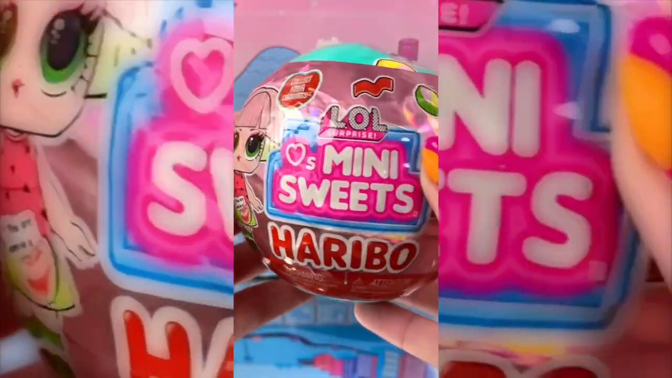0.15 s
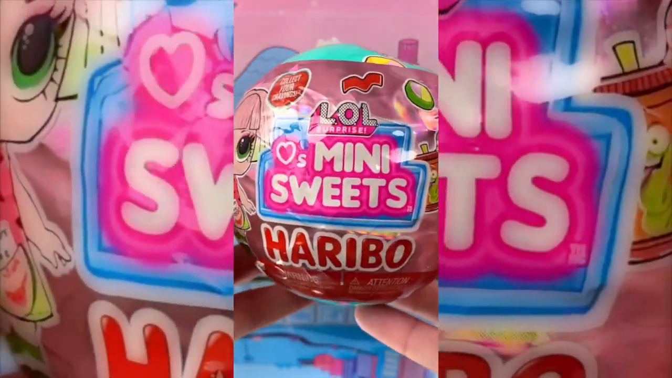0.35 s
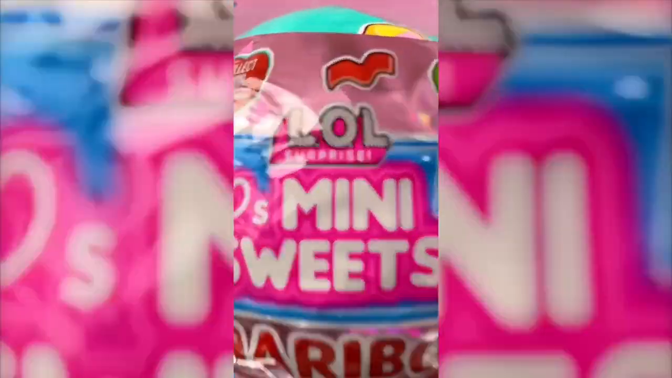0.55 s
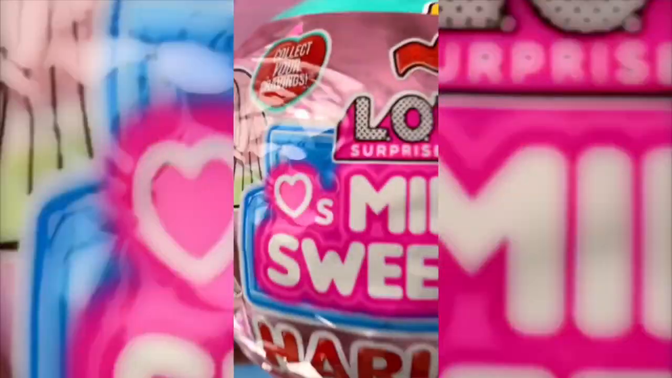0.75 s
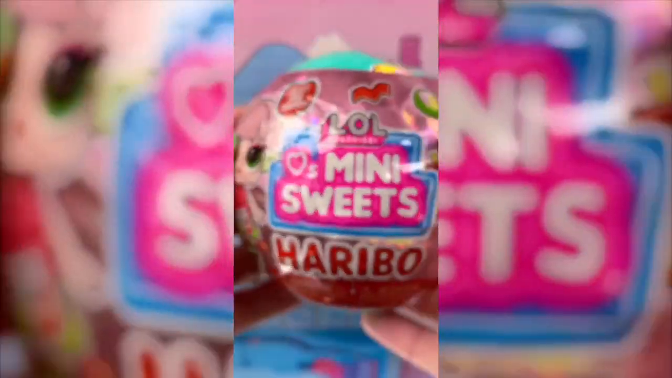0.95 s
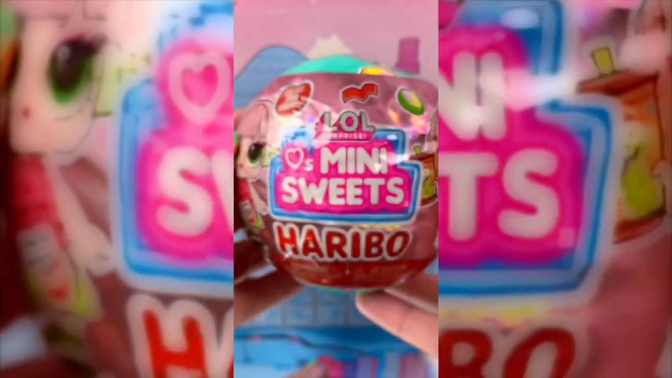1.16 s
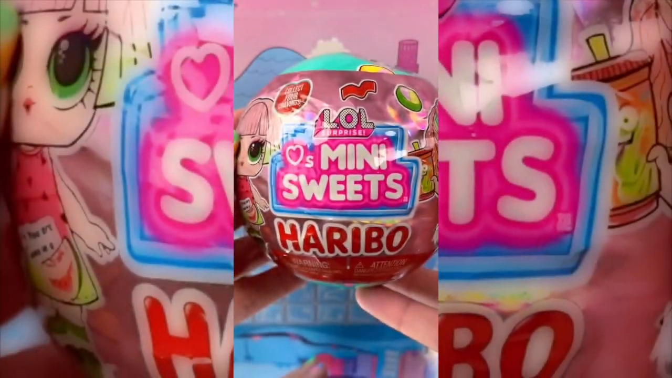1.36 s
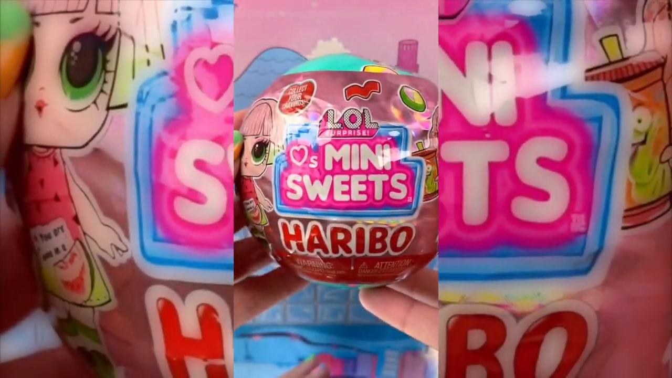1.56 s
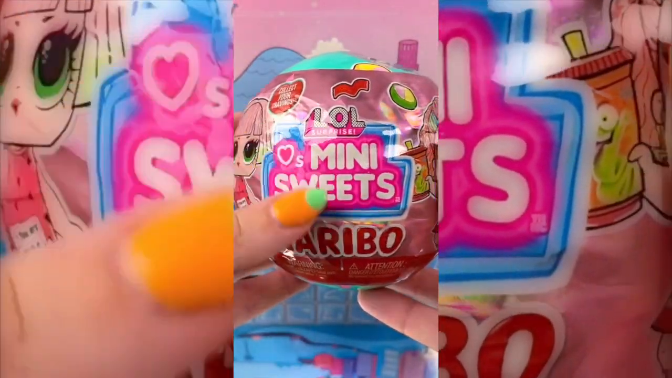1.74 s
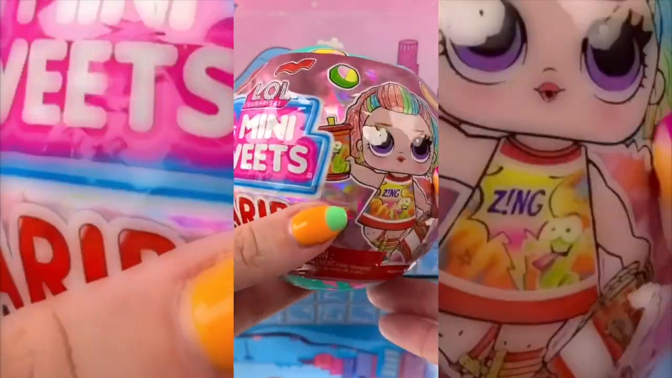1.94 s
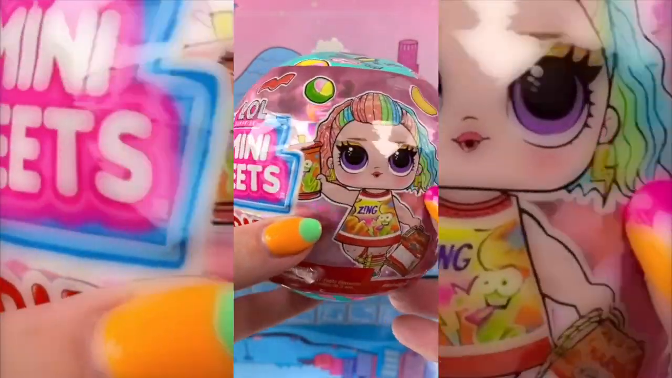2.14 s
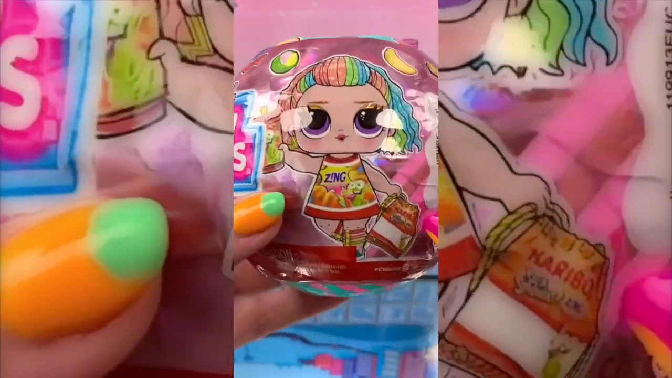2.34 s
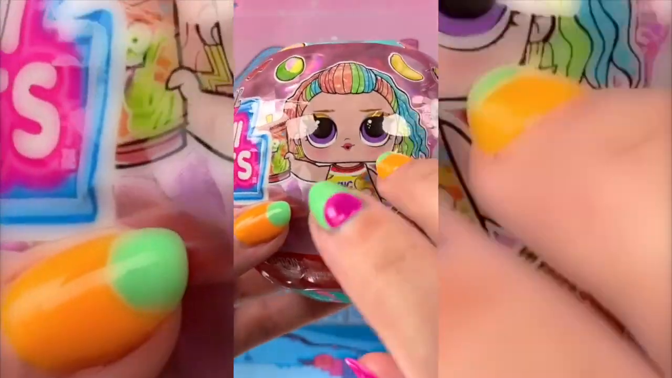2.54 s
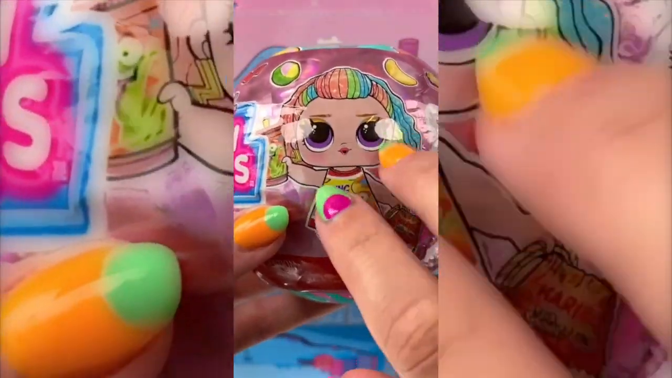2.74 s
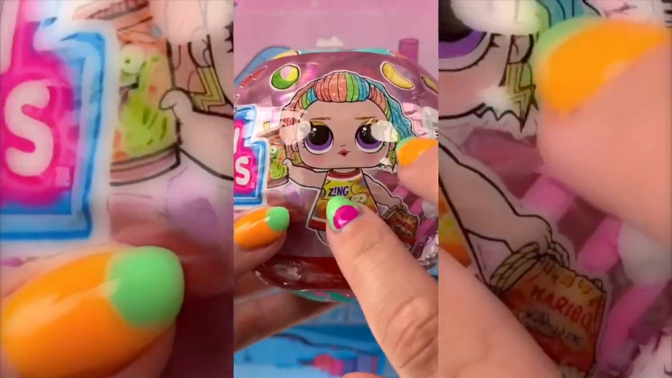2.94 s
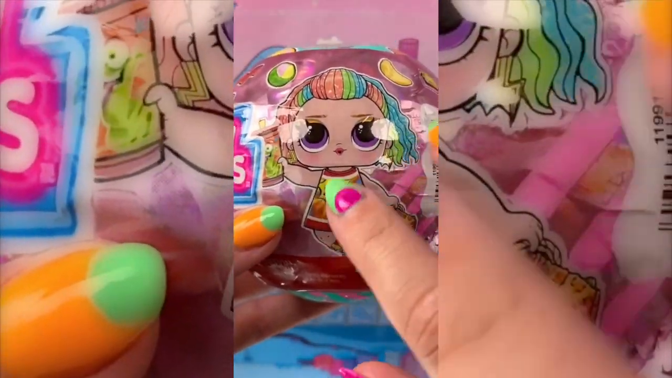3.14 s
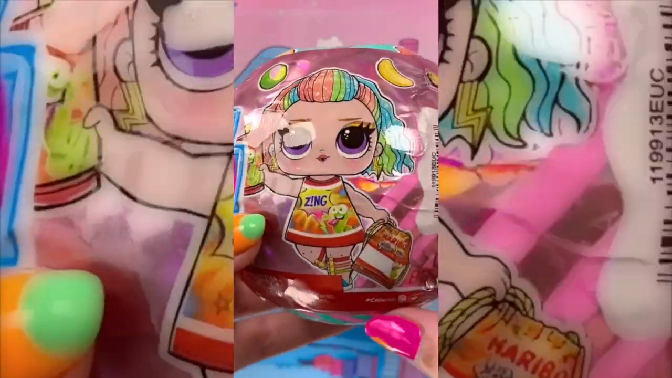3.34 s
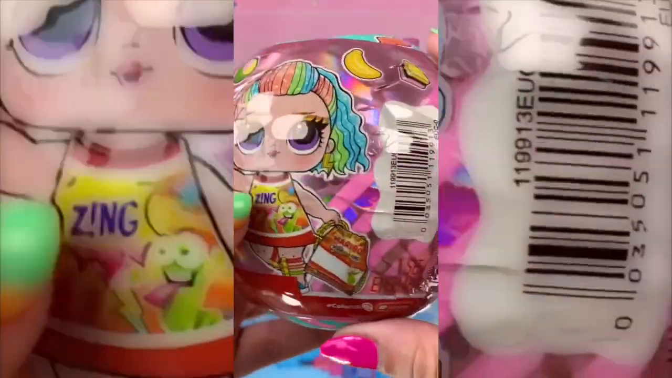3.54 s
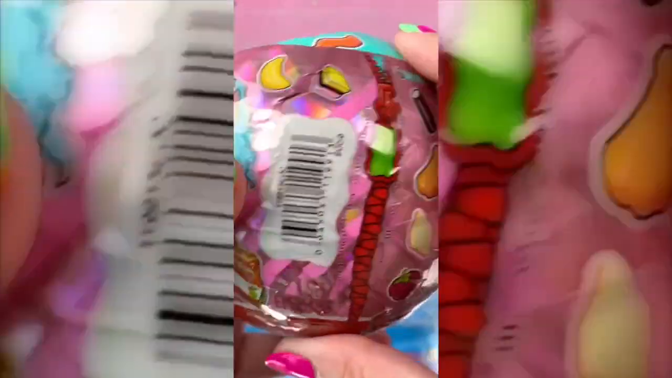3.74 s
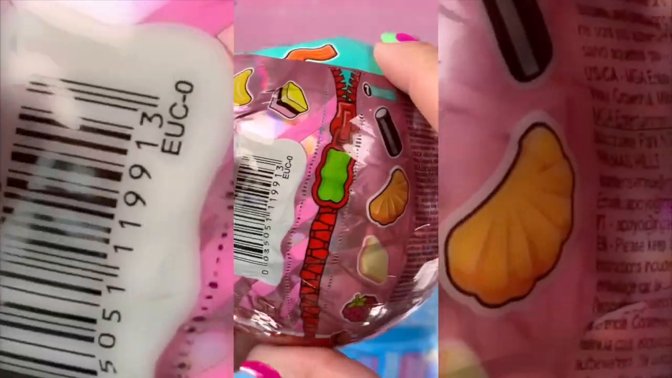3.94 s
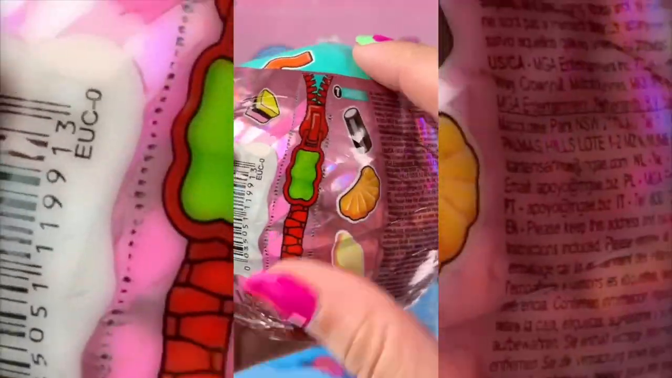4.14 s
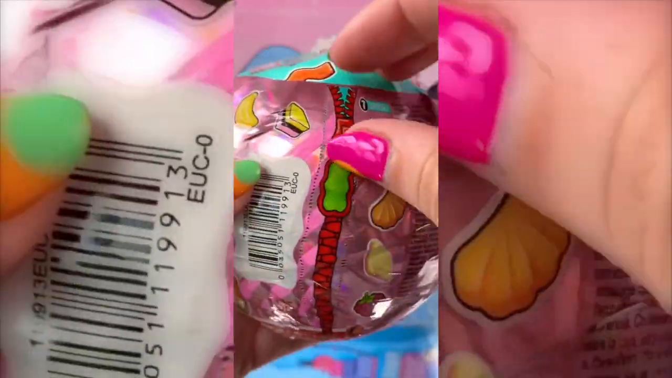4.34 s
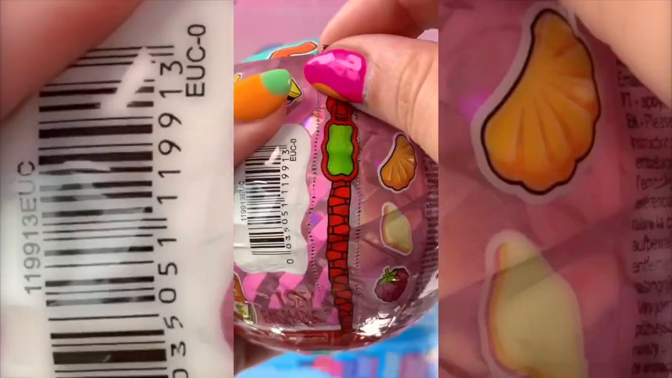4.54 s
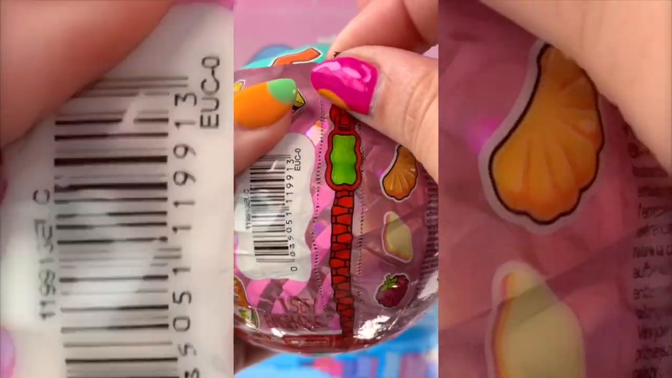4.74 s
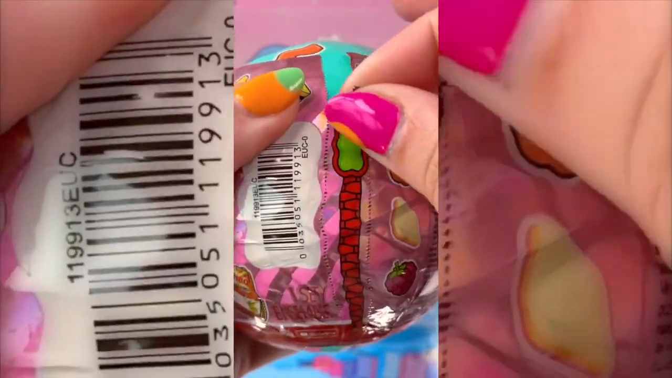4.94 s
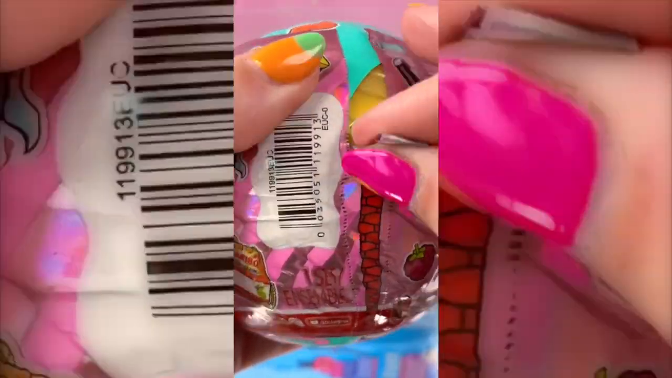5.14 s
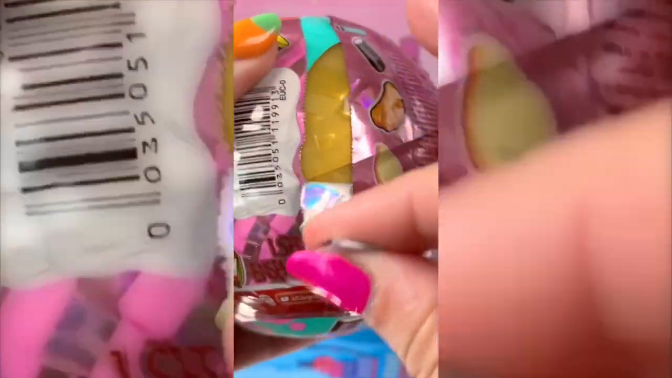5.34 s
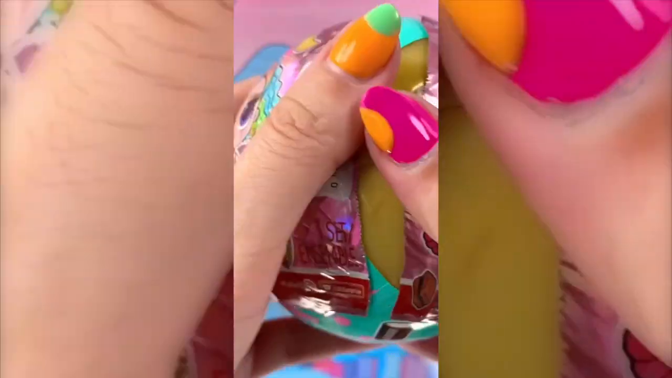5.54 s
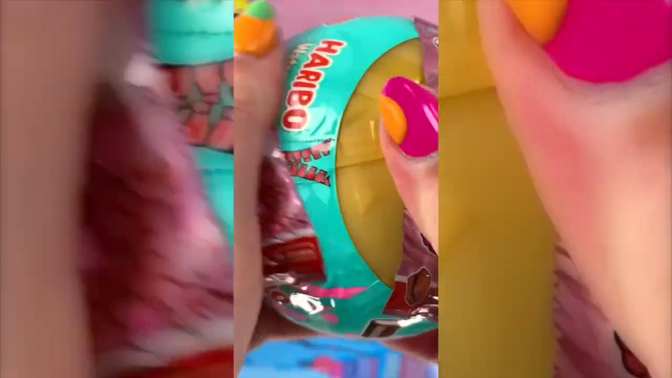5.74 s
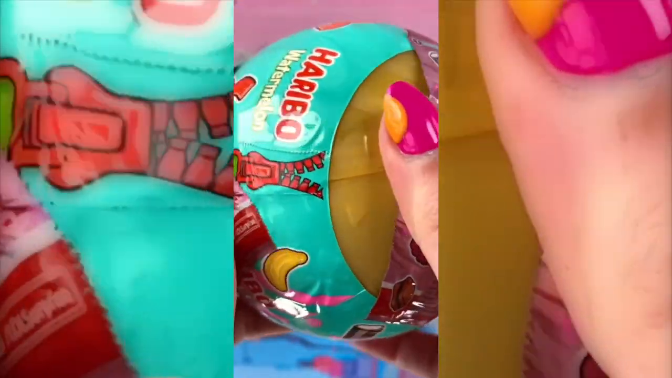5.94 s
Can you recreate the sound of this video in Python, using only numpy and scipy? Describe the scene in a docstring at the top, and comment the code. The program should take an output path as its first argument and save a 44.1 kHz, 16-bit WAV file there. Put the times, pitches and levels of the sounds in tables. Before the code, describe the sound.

Firm fingernail taps on a film-wrapped hollow plastic ball, then a perforated strip zips open in bursts and the film crackles.

```python
"""Film-wrapped toy ball unwrapped

A plastic ball in shrink film, close to two microphone ports in a small room with rumble, hum and a far thump.
Fingers brush the film (filtered grains); nails tap film and shell (noise cracks plus modes), four taps firmly.
A perforated strip tears bridge by bridge: cracks and plucked rings, mostly lower as its loose end grows.
The opened film is peeled: folds crack and ring their panels, and sliding film crackles."""
import sys
import numpy as np
from scipy import signal
from scipy.fft import rfft, irfft, next_fast_len
from scipy.io import wavfile
from scipy.ndimage import uniform_filter1d, map_coordinates

SR = 44100
rng = np.random.default_rng(int(sys.argv[2]) if len(sys.argv) > 2 else 0)


def bounce(signal):
    """Save signal as a 16-bit WAV file at the path given by the first command-line argument."""
    frames = np.transpose(np.atleast_2d(signal))
    limited = np.clip(frames, -1, 1)
    pcm = np.round(limited * 32767).astype(np.int16)
    wavfile.write(sys.argv[1], SR, pcm)


N = 264159
TIME = np.arange(N) / SR


def from_db(db):
    """Amplitude ratio of a level in dB."""
    return 10 ** (np.asarray(db) / 20)


def at_hz(points, hz):
    """Read a table on a log-frequency axis."""
    table_hz, values = np.array(points)[:, 0], np.array(points)[:, 1]
    return np.interp(np.log(np.maximum(hz, 1)), np.log(table_hz), values)


def add(track, s, sound):
    """Mix a short sound in at a time in seconds."""
    start = min(max(round(s * SR), 0), N)
    track[start:start + len(sound)] += sound[:N - start]


def split_bands(x, order, split_hz):
    """Low and high part of a sound, by Butterworth filters."""
    return [signal.sosfilt(signal.butter(order, split_hz, kind, fs=SR, output="sos"), x)
            for kind in ("low", "high")]


def coloured(x, points, size=8192):
    """Causal minimum-phase filter with the given gains, built by folding the cepstrum."""
    gains = from_db(at_hz(points, np.fft.rfftfreq(size, 1 / SR)))
    cepstrum = irfft(np.log(gains))
    cepstrum[1:size // 2] *= 2
    cepstrum[size // 2 + 1:] = 0
    response = irfft(np.exp(rfft(cepstrum)))
    return signal.fftconvolve(x, response)[:len(x)]


def grains(per_s, spread_db):
    """Random clicks of uneven size, rms 1."""
    sizes = from_db(spread_db * np.minimum(rng.exponential(1, N), 4)) * rng.choice([-1, 1], N)
    clicks = sizes * (rng.random(N) < per_s / SR)
    return clicks / clicks.std()


def dying_noise(t60_points, count=24):
    """One second of diffuse sound, each band dying at its own rate."""
    t, hz = TIME[:SR], np.fft.rfftfreq(SR, 1 / SR)
    white = rfft(rng.standard_normal(SR))
    edges = np.geomspace(20, SR / 2, count)
    total = np.zeros(SR)
    for low, high in zip(edges, edges[1:]):
        band = irfft(white * (hz >= low) * (hz < high), SR)
        t60_s = at_hz(t60_points, np.sqrt(low * high))
        total += band * from_db(-60 * t / t60_s)
    return total


def ring(hz, t60_s):
    """A struck mode: a sine that decays exponentially."""
    t = TIME[:SR // 20]
    return np.sin(2 * np.pi * hz * t) * np.exp(-np.log(1000) * t / t60_s)


def snap(treble_db, rise_s, decay_s, flutter_db, flutter_s=0.0051, treble_decay_s=0.00067, split_hz=6500):
    """A crack scatters through the film; its treble dies in milliseconds, the rest flutters on."""
    t = TIME[:SR // 20]
    kinks = rng.choice([-1, 1], len(t)) * rng.exponential(1, len(t))  # a few strong among many weak
    onset = (1 - np.exp(-(t / rise_s) ** 2)) * kinks
    body = onset * (np.exp(-t / decay_s) + from_db(flutter_db) * np.exp(-t / flutter_s))
    edge = onset * np.exp(-t / treble_decay_s)
    # each filter runs twice for a steeper split
    low = split_bands(split_bands(body / np.linalg.norm(body), 2, split_hz)[0], 2, split_hz)[0]
    high = split_bands(split_bands(edge / np.linalg.norm(edge), 2, split_hz)[1], 2, split_hz)[1]
    return np.sqrt(.002 * SR) * (low + from_db(treble_db) * high)  # energy of 2 ms at rms 1, before the split


SLIDE_ATTACK_S, SLIDE_RELEASE_S = 0.0068, 0.0053


def slide(start_s, length_s, db, attack_s=SLIDE_ATTACK_S, release_s=SLIDE_RELEASE_S):
    """Gain in time of one slide: attack, hold, release."""
    before = np.maximum(start_s - TIME, 0) / attack_s
    after = np.maximum(TIME - start_s - length_s, 0) / release_s
    return from_db(db) * np.exp(-np.minimum(before + after, 20))


# Background noise spectrum. Each row: frequency in Hz, gain in dB.
FLOOR_COLOUR = [(25, -18), (65, 3.5), (120, -13.5), (250, -18), (370, -36), (600, -44.5), (1500, -56),
                (6000, -62), (14000, -68.5)]
# Rise and fall of rumble and hum. Each row: time in seconds, gain in dB.
RUMBLE_GAIN = [(0, -8.5), (1.3, -3), (4.05, 0.5), (4.5, -4)]


def background(hum_hz=60, hum_db=-49.0, drone_hz=183, drone_db=-53.0, drone_s=3.65, drone_half_s=0.37):
    """Low house rumble with mains hum, both moving in level; a faint drone swells once and fades."""
    hum = from_db(hum_db) * np.sin(2 * np.pi * hum_hz * TIME)  # before the moving gain
    swell = np.exp(-.5 * ((TIME - drone_s) / drone_half_s) ** 2)
    drone = from_db(drone_db) * swell * np.sin(2 * np.pi * drone_hz * TIME)
    noise = from_db(-22) * coloured(rng.standard_normal(N), FLOOR_COLOUR)
    rumble = signal.sosfilt(signal.butter(1, 150, fs=SR, output="sos"), noise)
    moving_gain = from_db(np.interp(TIME, *np.transpose(RUMBLE_GAIN)))
    return moving_gain * (hum + rumble) + (noise - rumble) + drone


# Nail contacts. Each row: start in seconds, relative level in dB.
NAIL_TAPS = [(0.092, -41.5), (0.106, -43), (0.138, -46.5), (0.298, -45), (1.565, -41), (1.668, -57),
             (1.737, -39.5), (1.871, -49), (1.96, -53), (2.076, -59), (2.4946, -14.5), (2.6194, -10),
             (2.705, -10.5), (2.8135, -10), (3.277, -38), (3.195, -56), (3.428, -44.5), (3.913, -47.5)]
# Modes of the hollow shell. Each row: frequency in Hz, relative level in dB, t60 in seconds.
SHELL_MODES = [(510, -20.5, 0.004), (1140, -9.5, 0.009), (2420, -11.5, 0.014), (4490, -2, 0.0093),
               (5560, -20, .012), (6560, -5.5, 0.0054), (9400, -14.5, 0.0093)]
# Spectrum of cracks and crackles in the film. Each row: frequency in Hz, gain in dB.
FILM_COLOUR = [(60, -20.5), (250, -8), (1100, -1.5), (1550, -9.5), (2000, 5), (2800, 3.5), (5000, 5),
               (7000, 4.5), (10000, 2.5), (16000, -7)]
# lighter contacts are duller: dB per octave for each dB below a firm tap, pivot 2 kHz
FIRM_TAP_DB, SOFT_TILT = -8, .045


def nail_taps(crack_db=-13.5, shell_db=-1.0):
    """The nail cracks on the film, then lands on the shell, whose modes answer differently each time."""
    cracks, shell = np.zeros(N), np.zeros(N)
    for s, db in NAIL_TAPS:
        crack = snap(1.0, rise_s=0.00054, decay_s=0.00097, flutter_db=-13.0)
        add(cracks, s, from_db(db + crack_db) * crack)
        for hz, mode_db, t60_s in SHELL_MODES:
            strength, detune, lag = rng.standard_normal(3)
            soft_db = SOFT_TILT * (db - FIRM_TAP_DB) * np.log2(hz / 2000)
            level_db = db + shell_db + mode_db + soft_db + 0.5 * strength
            mode = ring(hz * (1 + 0.013 * detune), t60_s)
            add(shell, s + .0004 + 0.00027 * abs(lag), from_db(level_db) * mode)
    return coloured(cracks, FILM_COLOUR) + shell


def tap_spread(level_db=17.0, low_hz=2800, high_hz=6500):
    """Summed over all directions, a tap reaches the walls as one smooth, bright click."""
    clicks = np.zeros(N)
    for s, db in NAIL_TAPS:
        add(clicks, s, [from_db(db + level_db)])
    return signal.sosfilt(signal.butter(1, [low_hz, high_hz], "band", fs=SR, output="sos"), clicks)


# Fingertip strokes. Each row: start in seconds, length in seconds, relative level in dB, treble gain in dB.
BRUSH_STROKES = [(0.096, 0.0061, -51.5, -23), (0.315, 0.12, -75, -1), (0.451, 0.12, -64.5, -10.5),
                 (1.492, 0.0093, -72, 6), (1.565, 0.07, -67, -6), (1.757, 0.082, -60, -2),
                 (1.875, 0.093, -68.5, -7.5), (2.216, .06, -67.5, -5.5), (3.283, 0.18, -63, -2),
                 (3.502, 0.28, -74.5, 4), (3.981, 0.041, -60.5, 2.5), (4.141, 0.097, -66, 1),
                 (4.302, 0.059, -65.5, -4), (4.451, 0.011, -56.5, -9)]
# Spectrum of skin slipping on film. Each row: frequency in Hz, gain in dB.
BRUSH_COLOUR = [(300, 13.5), (1600, -7.5), (2700, 10), (4500, 8), (7500, 0.5), (15000, 11.5)]
# Drags that make the taut film sing. Each row: start in seconds, length in seconds, level in dB.
SINGING_RUBS = [(1.547, 0.13, -72.5), (1.763, 0.037, -70), (2.064, 0.224, -78)]
BRUSH_ATTACK_S, BRUSH_RELEASE_S = 0.0073, 0.016


def brushing(split_hz=6500, uneven_db=2.5, rub_hz=2800, rub_t60_s=.005):
    """Skin sticks and slips on the film in fine, uneven steps; where it drags, the taut film sings faintly."""
    grip = uniform_filter1d(rng.standard_normal(N), size=700)
    uneven_gain = from_db(uneven_db * grip / grip.std())
    slips = coloured(uneven_gain * grains(per_s=4000, spread_db=4.5), BRUSH_COLOUR)
    low, high = split_bands(slips, 3, split_hz)
    strokes = np.zeros(N)
    for start_s, length_s, db, treble_db in BRUSH_STROKES:
        gain = slide(start_s, length_s, db, BRUSH_ATTACK_S, BRUSH_RELEASE_S)
        strokes += gain * (low + from_db(treble_db) * high)
    singing = signal.fftconvolve(slips, ring(rub_hz, rub_t60_s))[:N]
    rub_gain = sum(slide(*row, BRUSH_ATTACK_S, BRUSH_RELEASE_S) for row in SINGING_RUBS)
    return from_db(-3.0) * strokes + singing / singing.std() * rub_gain


# Spells of small folds. Each row: start in seconds, length in seconds, mean relative level in dB.
PEELS = [(5.554, 0.036, -37), (5.638, .1, -17), (5.744, .14, -30.5), (5.94, .05, -20)]
SMALL_FOLDS_PER_S, SMALL_FOLD_SPREAD_DB, SMALL_PANEL_HZ = 64, 4.5, (1667, 3460)


def small_folds():
    """Rows of (s, dB, panel Hz): folds give way at uneven intervals while the film is peeled."""
    rows = []
    for start_s, length_s, db in PEELS:
        for s in np.arange(start_s, start_s + length_s, 1 / SMALL_FOLDS_PER_S):
            fold_s = s + rng.random() / SMALL_FOLDS_PER_S
            fold_db = db + SMALL_FOLD_SPREAD_DB * rng.standard_normal()
            panel_hz = np.exp(rng.uniform(*np.log(SMALL_PANEL_HZ)))
            rows.append((fold_s, fold_db, panel_hz))
    return rows


# Single folds of film buckling. Each row: start in seconds, relative level in dB, panel pitch in Hz.
SINGLE_FOLDS = [(0.462, -38, 5100), (3.382, -52.5, 6360), (3.462, -45, 5100), (5.5608, -24.5, 6015),
                (5.578, -13, 6270), (5.5999, -11, 6220), (5.6251, -12, 1840), (5.643, -8, 2080),
                (5.6602, -5, 3600), (5.702, -3.5, 2050), (5.724, -6.5, 4130), (5.827, -12, 4770),
                (5.8952, -14, 2400), (5.9286, -10.5, 2190), (5.9446, -8, 5210), (5.9488, -12, 5500),
                (5.952, -20, 640), (5.9605, -7, 2210), (5.9722, -3.5, 5240)]


def crinkles(panel_db=-4.5, panel_t60_s=0.019, treble_db_per_octave=4.5):
    """A fold flips with a crack and the film panel beside it rings; large, low panels crack duller."""
    cracks, panels = np.zeros(N), np.zeros(N)
    for s, db, hz in SINGLE_FOLDS + small_folds():
        treble_db = treble_db_per_octave * np.log2(hz / 6500)
        crack = snap(treble_db, rise_s=0.00061, decay_s=0.00092, flutter_db=-8, treble_decay_s=0.0027)
        add(cracks, s, from_db(db) * crack)
        add(panels, s + .0005, from_db(db + panel_db) * ring(hz, panel_t60_s))
    return from_db(-3.0) * coloured(cracks, FILM_COLOUR) + panels


# Spectrum of the far thump. Each row: frequency in Hz, gain in dB.
THUMP_COLOUR = [(30, 21), (120, 19), (250, 10.5), (450, 4), (1100, 0.5), (3000, -11.5), (8000, -20),
                (15000, -24)]


def far_thump(s=.7105, thud_hz=108, thud_db=-20.0, boom_db=-30.0, rattle_after_s=.14, rattle_db=-15.0):
    """Something heavy shuts further off: a low thud, a weaker second knock, and mostly the room."""
    out = np.zeros(N)
    t60_points = [(40, 1.5), (200, 0.62), (1500, 0.66), (12000, 0.16)]  # Hz, t60 in seconds
    for lag_s, db in (0, boom_db), (rattle_after_s, boom_db + rattle_db):
        add(out, s + lag_s, from_db(db) * coloured(dying_noise(t60_points), THUMP_COLOUR))
    add(out, s, -from_db(thud_db) * ring(thud_hz, 0.1))
    return out


# Bridges snapping singly, as the tab is picked loose or the pull stalls.
# Each row: start in seconds, relative level in dB.
PICKS = [(4.51, -29.5), (4.547, -18), (4.5781, -19), (4.5854, -19.5), (4.6316, -20.5), (4.648, -20),
         (4.7166, -17.5), (4.8796, -17.5), (4.8948, -25)]
# Pulls on the strip, each a run of bridges. Each row: start in seconds, length in seconds, bridge count,
# slowing down from -1 to 1, relative level in dB, pitch in Hz of the film beside the tear.
PULLS = [(4.7601, 0.036, 4, 0.33, -19, 5530), (4.8113, .049, 7, .05, -19.5, 5100),
         (4.9213, 0.058, 5, 0.13, -16.5, 3910), (5.0174, 0.12, 11, -0.48, -20.5, 3760),
         (5.1736, .1022, 9, .1, -18.5, 3500), (5.294, 0.075, 10, -0.085, -16, 4251),
         (5.4051, 0.067, 8, 0.17, -19.5, 3909)]
BRIDGE_SPREAD_DB, BRIDGE_JITTER_S, FACET_SPREAD_OCTAVES = 3, 0.00039, 0.163
PULL_SOFT_START_DB, PULL_GRIP_S = -2, 0.0072  # force builds up at the start of a pull
FIBRES_PER_S, FIBRE_DB, RAGGED_FROM_S = 40, -6, 5.0  # pulls starting later also snap stray fibres


def bridges():
    """Rows of (s, dB, film Hz): evenly spaced bridges pass as fast as the hand pulls, stray fibres among them."""
    rows = [(s, db, PULLS[0][-1]) for s, db in PICKS]
    for start_s, length_s, count, slowing, db, hz in PULLS:
        along = np.linspace(0, 1, max(round(count), 2))
        late, strong = rng.standard_normal((len(along), 2)).T
        progress = along - slowing * along * (1 - along)
        times_s = start_s + length_s * progress + BRIDGE_JITTER_S * late
        soft_start_db = PULL_SOFT_START_DB * np.exp(-length_s * along / PULL_GRIP_S)
        levels_db = db + BRIDGE_SPREAD_DB * strong + soft_start_db
        rows += [(s, level_db, hz) for s, level_db in zip(times_s, levels_db)]
        if start_s > RAGGED_FROM_S:
            places = rng.random(round(FIBRES_PER_S * length_s))
            rows += [(start_s + length_s * place, db + FIBRE_DB, hz) for place in places]
    return [(s, db, hz * 2 ** (FACET_SPREAD_OCTAVES * rng.standard_normal())) for s, db, hz in rows]


# Loose end of the strip. Each row: time in seconds, pitch in Hz, ring level in dB relative to the bridge.
LOOSE_END = [(4.898, 4700, -25), (4.922, 5040, 12.5), (4.982, 2600, -4.5), (5.05, 1960, 2),
             (5.145, 1210, -5.5), (5.19, 2200, -10), (5.317, 1977, 3), (5.368, 1194, -2),
             (5.471, 1130, -14)]
# Spectrum of the tearing cracks. Each row: frequency in Hz, gain in dB.
TEAR_COLOUR = [(30, -14), (100, 11.5), (330, -8), (700, -3), (1200, -3.5), (1550, -14.5), (2000, 4),
               (2600, 0), (3300, 4), (4200, 4), (9000, 4), (15000, 2.5)]
# How well the wrapped ball passes the rings. Each row: frequency in Hz, gain in dB.
RING_COLOUR = [(200, -25), (850, -8.5), (1200, 2), (1550, -9.5), (1950, 2), (2600, -3), (3400, 0)]
STRIP_T60_S = .017
SHRED_AFTER_S, SHRED_DB = 0.0033, -6.5  # last shred of a bridge; the delay is scaled at random


def tear_strip(crack_db=-3.0, treble_db=2.5, facet_db=-3.0, facet_t60_s=0.015):
    """Each bridge cracks, rings the film beside it and plucks the strip, mostly lower as it lengthens."""
    cracks, rings = np.zeros(N), np.zeros(N)
    when_s, pitches_hz, ring_dbs = np.transpose(LOOSE_END)
    for s, db, facet_hz in bridges():
        shred_lag_s = SHRED_AFTER_S * rng.uniform(.4, 1.2)
        for lag_s, loss_db in (0, 0), (shred_lag_s, SHRED_DB):
            crack = snap(treble_db, rise_s=0.00017, decay_s=0.00084, flutter_db=-18.5, treble_decay_s=0.00098)
            add(cracks, s + lag_s, from_db(db + crack_db + loss_db) * crack)
        add(rings, s + 0.00027, from_db(db + facet_db) * ring(facet_hz, facet_t60_s))
        strip_hz = np.interp(s, when_s, pitches_hz) * np.exp(0.068 * rng.standard_normal())
        strip_db = db + np.interp(s, when_s, ring_dbs)
        add(rings, s + 0.00064, from_db(strip_db) * ring(strip_hz, STRIP_T60_S))
    return coloured(cracks, TEAR_COLOUR) + coloured(rings, RING_COLOUR)


# Film sliding over the shell. Each row: start in seconds, length in seconds, relative level in dB.
FILM_SLIDES = [(5.31, 0.019, -29), (5.443, 0.045, -44), (5.588, .026, -26), (5.656, 0.11, -55),
               (5.925, 0.073, -41.5)]
PULL_DRAG_DB = -36  # the strip's own sliding, relative to its pull


def film_drag():
    """Sliding film breaks into a dense spray of tiny crackles."""
    pulls = [(start_s, length_s, db + PULL_DRAG_DB) for start_s, length_s, _, _, db, _ in PULLS]
    sliding = sum(slide(*row) for row in FILM_SLIDES + pulls)
    return from_db(2.0) * coloured(sliding * grains(per_s=5000, spread_db=4.0), FILM_COLOUR)


def jolt(s=5.452, hz=105, db=-26.5, t60_s=0.074):
    """The ball jolts in the hand as the strip comes free: a short low sine."""
    out, t = np.zeros(N), TIME[:SR // 4]
    add(out, s, from_db(db - 60 * t / t60_s) * np.sin(2 * np.pi * hz * t))
    return out


# Spectrum of the room tail. Each row: frequency in Hz, gain in dB.
ROOM_COLOUR = [(150, -19), (1000, 2), (2600, -1.5), (5000, -2.5), (9000, -3), (15000, 9)]
# Decay of the room. Each row: frequency in Hz, t60 in seconds.
ROOM_T60 = [(100, 1), (1000, 0.3), (4500, 0.27), (15000, 0.063)]


def room(x, wet_db=-18.0, delay_s=0.0017):
    """A diffuse tail, different at each port."""
    sides = []
    for _ in "LR":
        tail = dying_noise(ROOM_T60) * (TIME[:SR] > delay_s)
        response = coloured(tail / np.linalg.norm(tail), ROOM_COLOUR)
        sides.append(signal.fftconvolve(x, response)[:N])
    return from_db(wet_db) * np.array(sides)


# Phase between the microphone ports. Each row: frequency in Hz, lead of the left in radians.
PORT_PHASE = [(1500, 0), (2600, 0.44), (5200, 0.53), (7200, 3), (10300, 5.5), (13500, 9), (16500, 15.5)]
PLACE_CHANGE_S, PLACE_LAG_S = .012, .000007  # cracks come from all over the film; lag is the rms of its draws


def ports(x):
    """Near sound reaches the right port later in the treble, by a lag that changes with the place on the ball."""
    size = next_fast_len(N + SR // 10)
    phase = np.exp(-1j * at_hz(PORT_PHASE, np.fft.rfftfreq(size, 1 / SR)))
    late = irfft(rfft(x, size) * phase, size)
    place = np.interp(TIME / PLACE_CHANGE_S, np.arange(N), rng.standard_normal(N))
    right = map_coordinates(late, [(TIME + PLACE_LAG_S * place) * SR], order=5)
    return np.array([x, right[:N]])


def scene():
    """The ball close up, the room around it."""
    film = tear_strip() + crinkles() + film_drag() + brushing()
    taps = nail_taps()
    reverberant = room(film + tap_spread() + from_db(-4.5) * taps)
    return ports(film + taps) + jolt() + reverberant + far_thump() + background()


CUTOFF_HZ = 16200


def record(dry):
    """The highest peaks are rounded and the top is cut."""
    rounded = 1.1 * np.tanh(dry / 1.1)
    return signal.sosfilt(signal.ellip(10, .2, 70, CUTOFF_HZ, fs=SR, output="sos"), rounded)


dry = scene()
out = record(dry)
bounce(out)
```